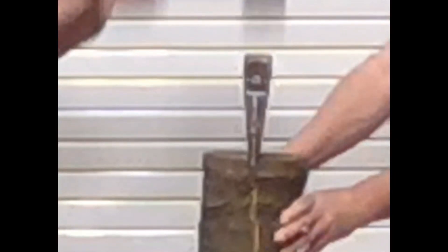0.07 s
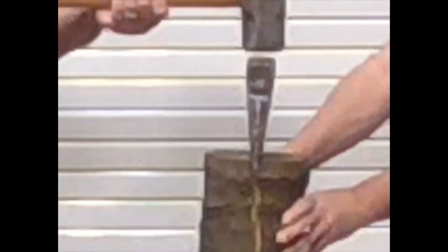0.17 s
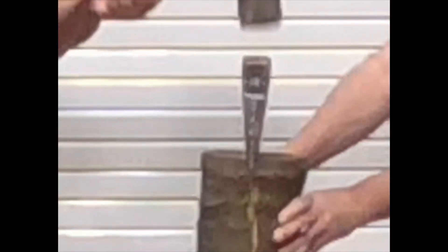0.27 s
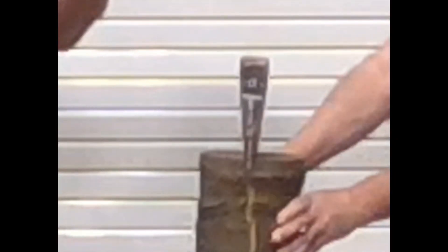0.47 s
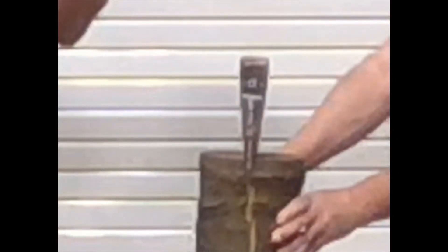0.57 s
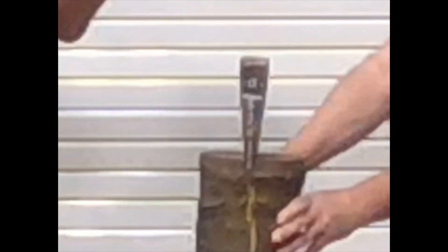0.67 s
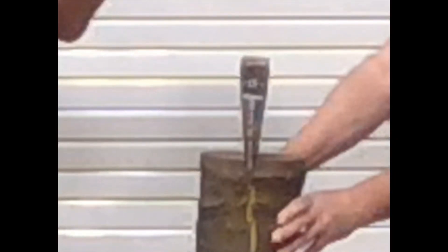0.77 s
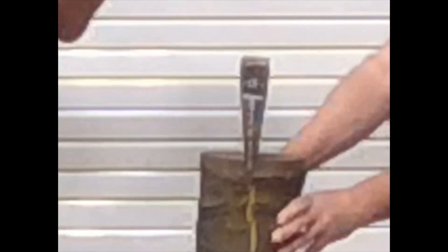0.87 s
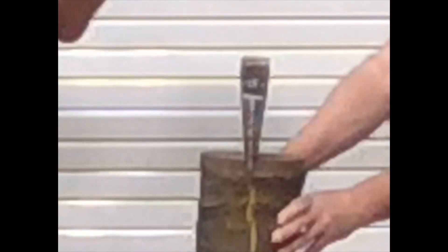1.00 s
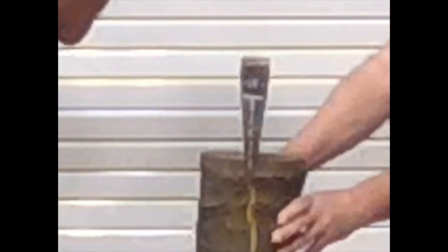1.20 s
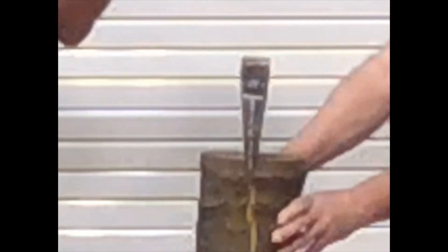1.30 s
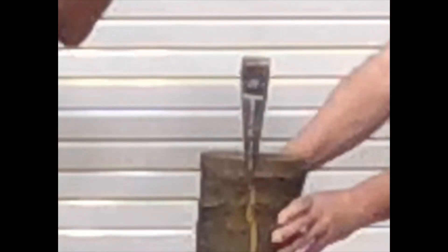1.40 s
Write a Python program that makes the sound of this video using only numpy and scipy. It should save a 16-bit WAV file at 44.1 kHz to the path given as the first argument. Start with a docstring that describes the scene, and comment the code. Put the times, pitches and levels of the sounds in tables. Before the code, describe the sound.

One hard hammer blow lands on a metal wedge standing in a log, ringing sharply over a low thud. Faint dull bumps and a small metallic clink follow as the echo fades in a bare, faintly humming room.

```python
"""A bare, echoing room hums faintly and still holds the end of an earlier blow. At 0.2 s a sledgehammer
hits a steel wedge standing in a log: the impact excites their modes, giving a crack, a clang, a hollow
knock and a thin high ring, and the log thuds on the floor. A limiter flattens the blow.
As the echo dies the log settles with three dull bumps. Near 1 s the room's low hum swells briefly,
and near 1.2 s the steel gives one light clink."""
import sys
import numpy as np
from scipy import signal
from scipy.fft import rfft, irfft, next_fast_len
from scipy.io import wavfile
from scipy.ndimage import uniform_filter1d, minimum_filter1d

SR = 44100
rng = np.random.default_rng(int(sys.argv[2]) if len(sys.argv) > 2 else 0)


def unload_audio(sound):
    """Save the sound as a 16-bit wav file, at the path given as the first command line argument."""
    columns = np.transpose(np.atleast_2d(sound))
    # keep every value between -1 and 1, then stretch to whole-number steps
    steps = np.round(np.clip(columns, -1, 1) * 32767)
    wavfile.write(sys.argv[1], SR, steps.astype(np.int16))


N = 63945
SIZE = next_fast_len(3 * N)
FREQS = np.fft.rfftfreq(SIZE, 1 / SR)
TIME = np.arange(N) / SR


def amp(db):
    """Amplitude ratio of a level in decibels."""
    return 10 ** (np.asarray(db) / 20)


def unit(x):
    """Normalisation to rms 1."""
    return x / np.sqrt(np.mean(x ** 2) + 1e-20)


def along(points, hz):
    """Interpolation of (f/Hz, value) points on a logarithmic frequency axis."""
    f, v = np.transpose(points)
    return np.interp(np.log(hz + 1), np.log(f + 1), v)


def fade(t, t60):
    """Exponential decay by 60 dB in t60 seconds."""
    return np.exp(-np.log(1000) * t / t60)


def filtered(x, response):
    """Convolution as a product of spectra."""
    return irfft(rfft(x, SIZE) * response, SIZE)[:N]


def minimum_phase(points):
    """Causal response through (f/Hz, level/dB) points, by folding the cepstrum."""
    cepstrum = irfft(np.log(amp(along(points, FREQS))), SIZE)
    cepstrum[1:SIZE // 2] *= 2
    cepstrum[SIZE // 2 + 1:] = 0
    return np.exp(rfft(cepstrum))


def resonance(hz, width_hz):
    """Frequency response of a damped oscillator."""
    return 1j * FREQS * width_hz / (hz * hz - FREQS ** 2 + 1j * FREQS * width_hz)


def at(x, s):
    """Time shift of x by s seconds."""
    return np.interp(np.arange(N) - round(s * SR), np.arange(N), x, left=0, right=0)


# hammer blows: t/s, relative level/dB
BLOWS = [(-.62, -0.5), (.2172, 0.5)]

def hammer():
    """Impact excitation: each blow sets log and steel vibrating freely, and the room reverberates."""
    impact, ring = log_knock() + crack(), clang()
    return sum(amp(db) * at(room(impact, direct_db=-19) + room(ring, direct_db=-12.5), s)
               for s, db in BLOWS)


# modes of the log with the wedge in it: f/Hz, bandwidth/Hz, relative level/dB
LOG_MODES = [(288, 23, -5.5), (342.5, 24, 4.5), (368.3, 25.2, 5.5), (561.4, 40, 1.5), (622, 22, -4),
             (856, 55, -19), (969, 60, -19.5), (1205, 70, -22.5), (1582, 100, -13.5), (2191, 91, -15),
             (2452, 90, -12.5), (2776, 67, -16), (3415, 61, -17), (4030, 28, -24.5)]

def log_knock():
    """Modal superposition: the log's impulse response, radiated poorly below a cutoff."""
    cutoff_hz = 217
    modes = sum(amp(db) * resonance(hz, width) for hz, width, db in LOG_MODES)
    radiation = FREQS ** 2 / (FREQS ** 2 + cutoff_hz ** 2)
    return amp(47.5) * irfft(modes * radiation, SIZE)[:N]


# spectrum of steel striking steel: f/Hz, relative level/dB
CRACK_SPECTRUM = [(30, -25), (130, -11), (250, 0), (460, -3.5), (780, -4.5), (1000, -3.5), (1950, -7.5),
                  (2700, -0.5), (4700, -9.5), (6500, 1.5), (8000, 1), (11000, 0.5), (13500, -1),
                  (15500, -6.5)]

def crack():
    """High modal density: short-lived modes overlap into a burst of decaying noise."""
    cluster = unit(rng.standard_normal(N) * fade(TIME, t60=.055)) / np.sqrt(N)
    return amp(18.5) * filtered(cluster, minimum_phase(CRACK_SPECTRUM))


# modes of the hard-struck steel: f/Hz, relative level/dB
CLANG_MODES = [(856, -2), (968, -1), (1209, -6), (1524, -2), (1613, 0), (1675, -3), (2210, -3), (2423, 1),
               (2532, 0), (2893, -1), (3403, -2), (3778, -4), (4400, -9), (7300, -8)]

def clang():
    """Free vibration: the steel's inharmonic modes decay at a common rate."""
    modes = sum(amp(db) * np.sin(2 * np.pi * hz * TIME) for hz, db in CLANG_MODES)
    return amp(-20.5) * fade(TIME, t60=.2) * modes


def wedge_ping():
    """Random modulation: the wedge's piercing top note wavers in the echo as it decays."""
    pitch_hz, waver_hz = 12460, 21.6
    low_pass = 1 / (1 + (FREQS / waver_hz) ** 4)
    in_phase = unit(filtered(rng.standard_normal(N), low_pass))
    quadrature = unit(filtered(rng.standard_normal(N), low_pass))
    phase = 2 * np.pi * pitch_hz * TIME
    tone = (1 + in_phase) * np.sin(phase) + quadrature * np.cos(phase)
    return sum(at(amp(db - 13) * tone * fade(TIME, t60=.52), s) for s, db in BLOWS)


def floor_thud():
    """Damped resonance: each blow drives the log against the floor in a short, low rumble."""
    centre_hz, rise_s, lead_s = 190, .01, .01
    band = resonance(centre_hz, width_hz=60) / (1 + (FREQS / centre_hz / 2) ** 2)
    rumble = unit(filtered(rng.standard_normal(N), band))
    envelope = (1 - np.exp(-TIME / rise_s)) * fade(TIME, t60=.16)
    return sum(at(amp(db - 12) * rumble * envelope, s - lead_s) for s, db in BLOWS)


# three bumps of the settling log, then a brief swell of the room's hum: t/s, level/dB, f/Hz
LOW_PULSES = [(0.676, -36, 137), (0.714, -24, 335), (0.781, -40.5, 198), (1.004, -38.5, 221.3)]

def bumps_and_hum_swell():
    """Damped oscillation: one low mode sounds for each bump of the log and for the hum's swell near 1 s."""
    rise_s = .0033
    envelope = (1 - np.exp(-TIME / rise_s)) * fade(TIME, t60=.1)
    return sum(at(amp(db) * envelope * np.sin(2 * np.pi * hz * TIME), s) for s, db, hz in LOW_PULSES)


# contacts within the clink: t/s, relative level/dB
CONTACTS = [(1.1597, 1.5), (1.1654, 6), (1.169, -6.5), (1.1725, -34)]
# spectrum of one contact: f/Hz, relative level/dB
TICK_SPECTRUM = [(80, -33), (300, 5), (600, 4), (1400, -5), (3000, 0), (5000, -12.5), (6400, -2.5),
                 (10000, -4.5), (14500, 10.5), (16000, -6)]

def clink():
    """Contact chatter: steel touches steel in brief broadband ticks, the first starting a ring."""
    bursts = sum(at(amp(db) * rng.standard_normal(N) * fade(TIME, t60=.021), s) for s, db in CONTACTS)
    ticks = amp(-41) * filtered(bursts, minimum_phase(TICK_SPECTRUM))
    chatter = room(ticks, direct_db=0, early_db=-1.5, early_t60=.11, tail_db=-5)
    return chatter + at(steel_ring(), CONTACTS[0][0])


# modes of the lightly touched steel: f/Hz, relative level/dB, T60/s
STEEL_MODES = [(865, -2, .38), (1136, 3, .45), (1790, -5, .5), (2400, -11, .35), (2920, -2, .38),
               (4404, -15, .35), (6643, -9, .2), (9927, -11, .2)]

def steel_ring():
    """Beating: each mode interferes with a weaker twin slightly higher in frequency."""
    rise_s, twin_db = .017, -5
    splits_hz = 27 * rng.uniform(.46, 1.85, len(STEEL_MODES))
    ring = np.zeros(N)
    for (hz, db, t60), split in zip(STEEL_MODES, splits_hz):
        mode = np.sin(2 * np.pi * hz * TIME)
        twin = amp(twin_db) * np.sin(2 * np.pi * (hz + split) * TIME)
        ring += amp(db) * fade(TIME, t60) * (mode - twin)
    return amp(-55.5) * ring * (1 - np.exp(-TIME / rise_s))


# reverberation time of the room: f/Hz, T60/s
REVERB_TIMES = [(60, 0.43), (200, 0.78), (370, 0.99), (600, .76), (1200, 0.93), (2500, 1), (4000, 0.85),
                (7500, 0.73), (11000, 0.44), (15500, 0.46)]

def room(x, direct_db, early_db=-9, early_t60=.66, tail_db=0):
    """Reverberation: direct sound, early reflections and a diffuse tail whose midrange lasts longest."""
    hz, t, spectra = signal.stft(rng.standard_normal(N), SR, nperseg=256)
    decay = fade(t, along(REVERB_TIMES, hz)[:, None])
    tail = signal.istft(spectra * decay, SR, nperseg=256)[1][:N]
    early = rng.standard_normal(N) * fade(TIME, early_t60)
    reflections = (amp(tail_db) * unit(tail) + amp(early_db) * unit(early)) / np.sqrt(N)
    return filtered(x, amp(direct_db) + rfft(reflections, SIZE))


# spectrum of the room's air noise: f/Hz, relative level/dB
AIR_SPECTRUM = [(25, -14.5), (70, -8), (120, -2.5), (220, 3.5), (380, -5.5), (600, -16.5), (1200, -25.5),
                (3000, -32), (6000, -37.5), (15000, -29.5)]

def room_tone():
    """Stationary noise: a broad, low band of air and a narrow band heard as a wavering hum."""
    air = filtered(rng.standard_normal(N), amp(along(AIR_SPECTRUM, FREQS)))
    hum = irfft(rfft(rng.standard_normal(SIZE)) * resonance(hz=220, width_hz=7.8), SIZE)[:N]
    return amp(-61) * unit(air) + amp(-59) * unit(hum)


def scene():
    """Superposition: the pressures of all sources add at one microphone."""
    return (hammer() + wedge_ping() + floor_thud() + bumps_and_hum_swell() + clink() + room_tone())[None]


def record(dry):
    """Dynamic range control: limiting, soft clipping and downward expansion, then a band-pass filter."""
    limit_db, clip_db, expand_below_db, expand_depth_db = -12, -2.5, -51.5, 6
    low_cut_hz, high_cut_hz = 60, 15750
    window, hold = int(.01 * SR), int(.011 * SR)
    rms = np.sqrt(np.abs(uniform_filter1d(dry[0] ** 2, window)) + 1e-12)
    gain = minimum_filter1d(np.minimum(1, amp(limit_db) / rms), hold, origin=(hold - 1) // 2)
    limited = dry[0] * uniform_filter1d(gain, window // 2)
    rounded = limited / (1 + (limited / amp(clip_db)) ** 6) ** (1 / 6)
    quietness = uniform_filter1d(1 / (1 + (rms / amp(expand_below_db)) ** 2), window)
    expanded = rounded * amp(-expand_depth_db * quietness)
    high_pass = (1j * FREQS / (low_cut_hz + 1j * FREQS)) ** 2
    low_pass = 1 / np.sqrt(1 + (FREQS / high_cut_hz) ** 240)
    return filtered(expanded, high_pass * low_pass)[None]


dry = scene()
out = record(dry)
unload_audio(out)
```